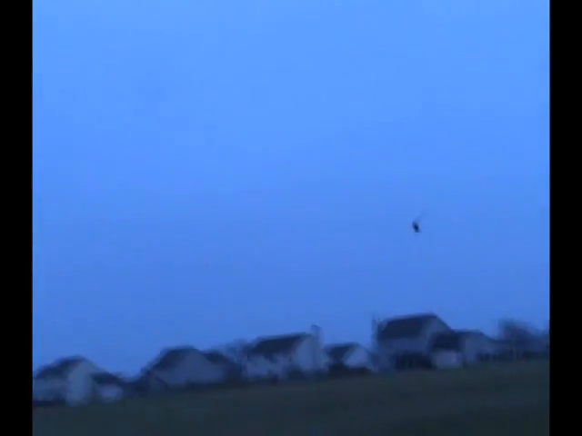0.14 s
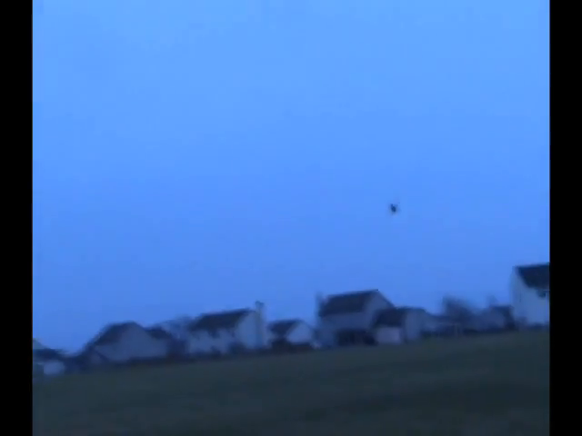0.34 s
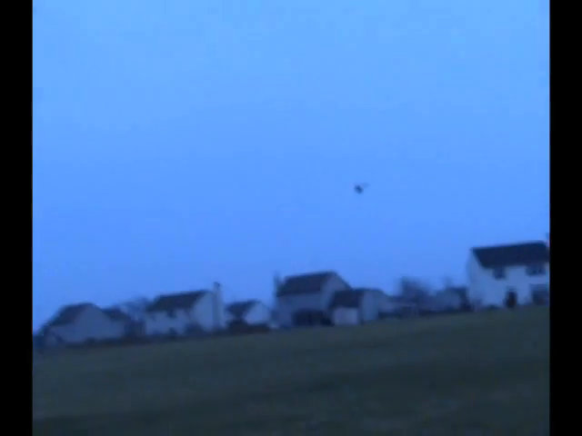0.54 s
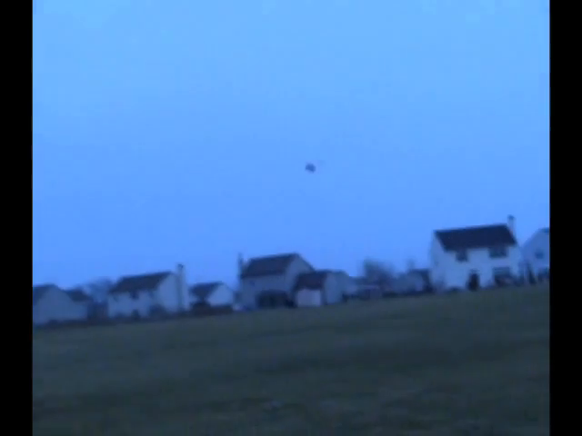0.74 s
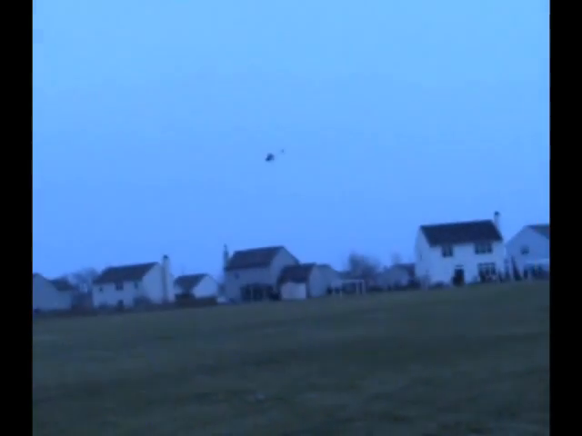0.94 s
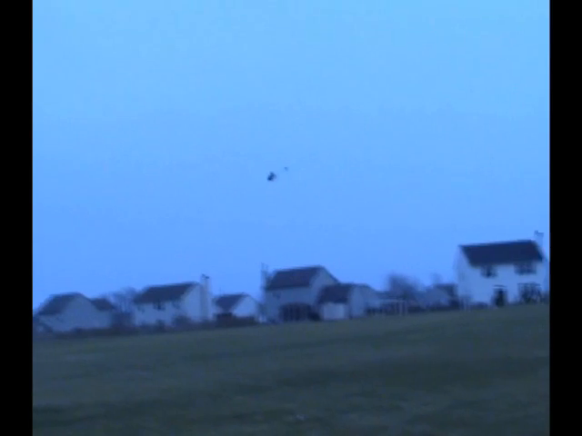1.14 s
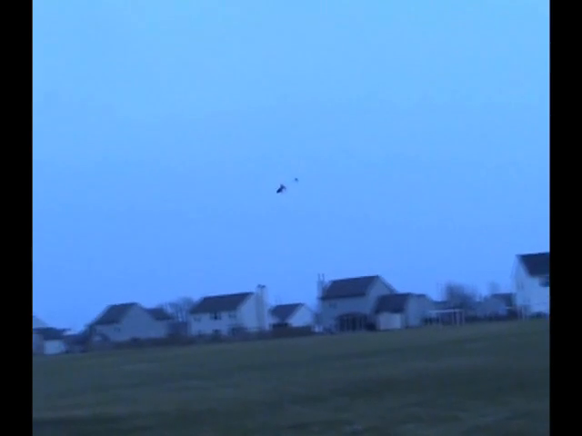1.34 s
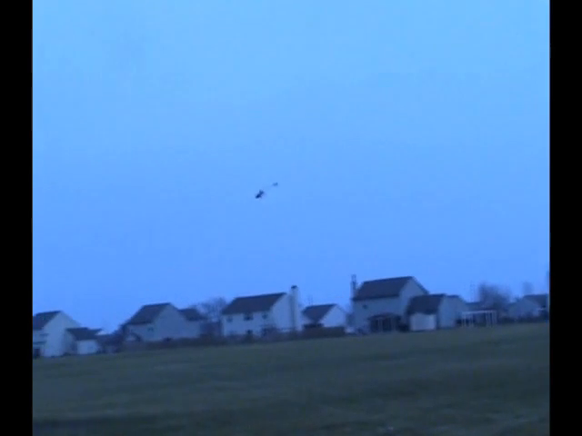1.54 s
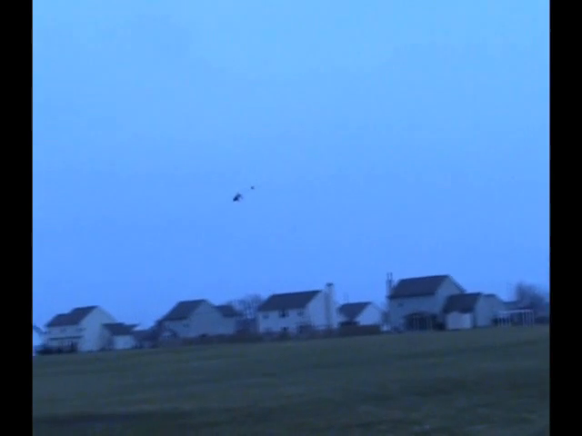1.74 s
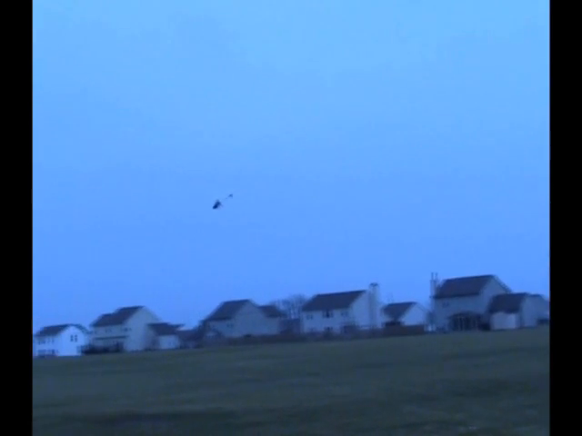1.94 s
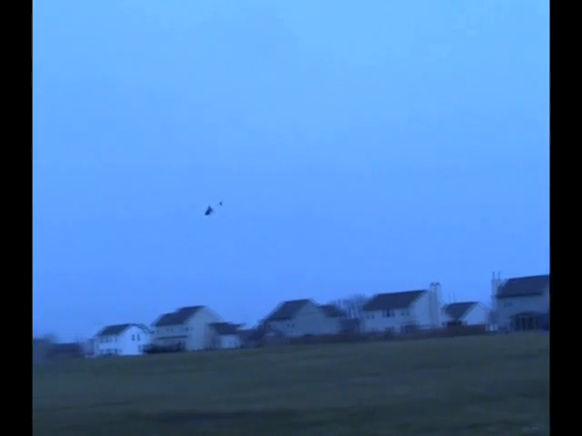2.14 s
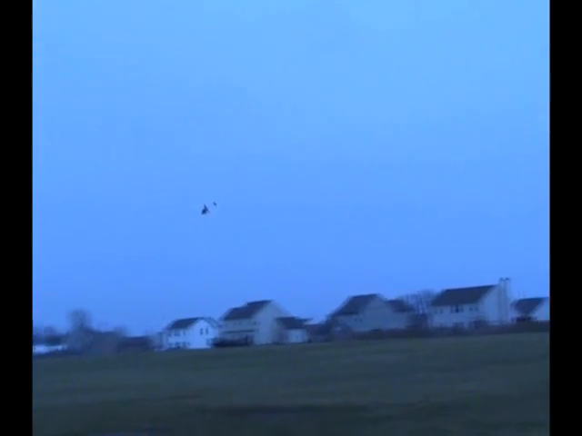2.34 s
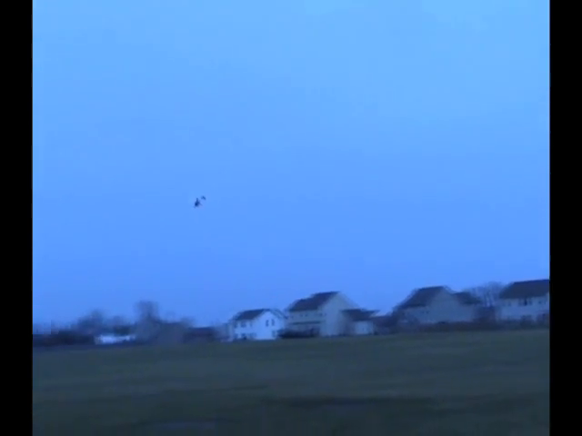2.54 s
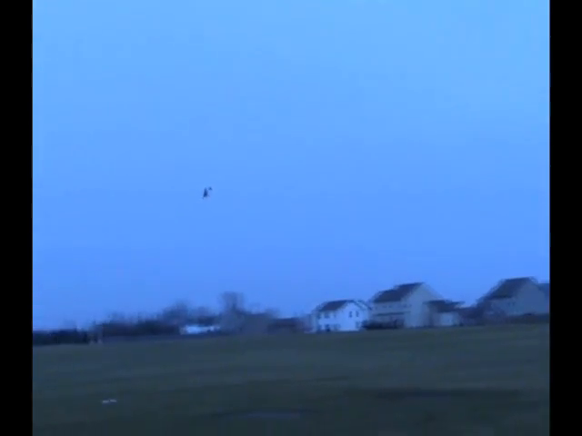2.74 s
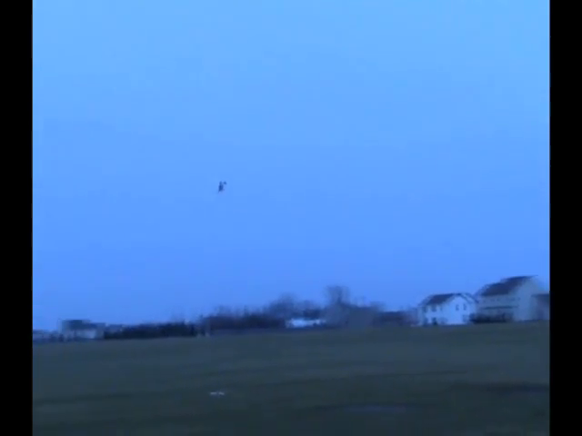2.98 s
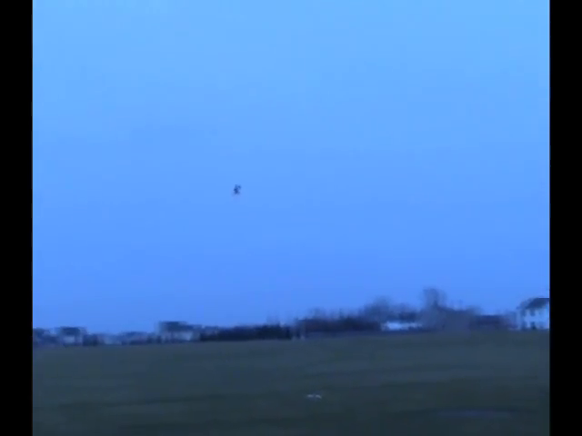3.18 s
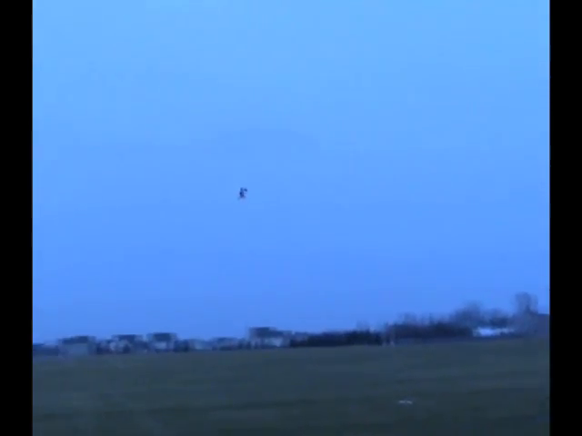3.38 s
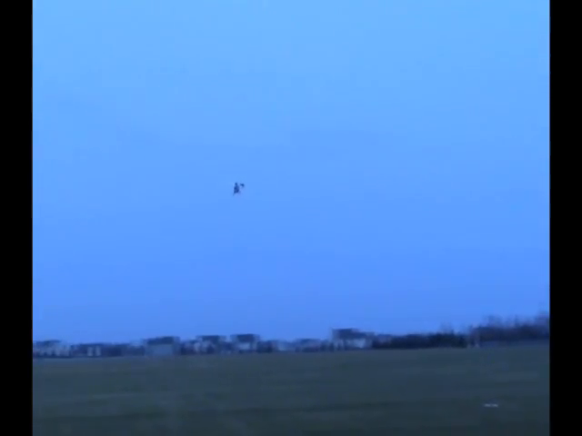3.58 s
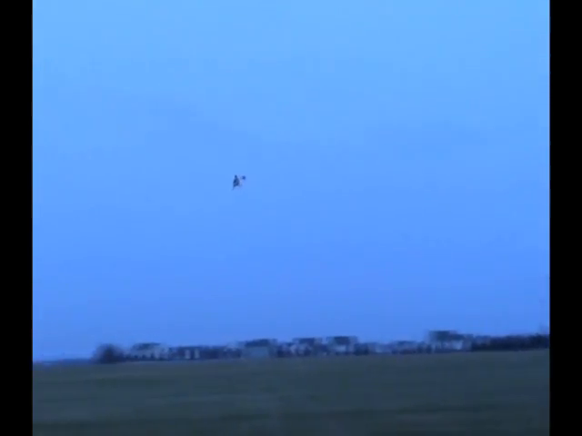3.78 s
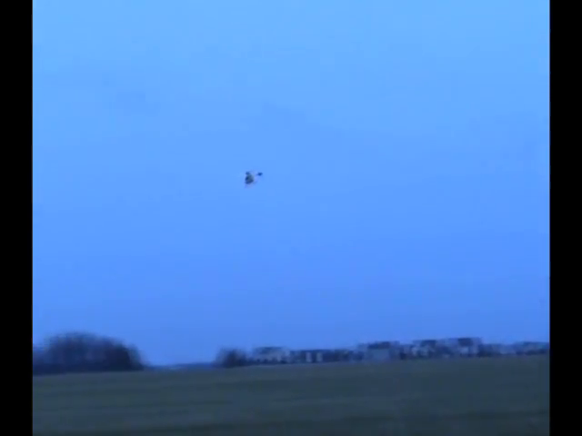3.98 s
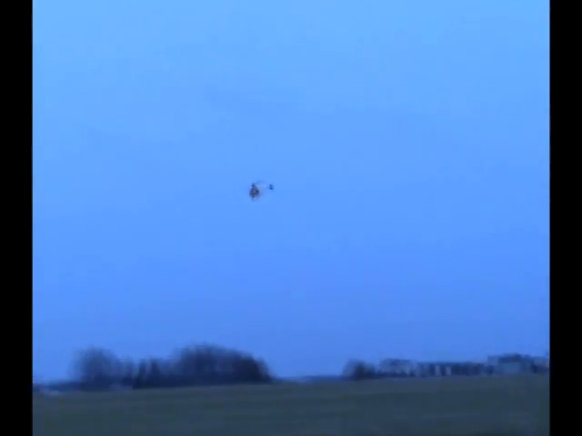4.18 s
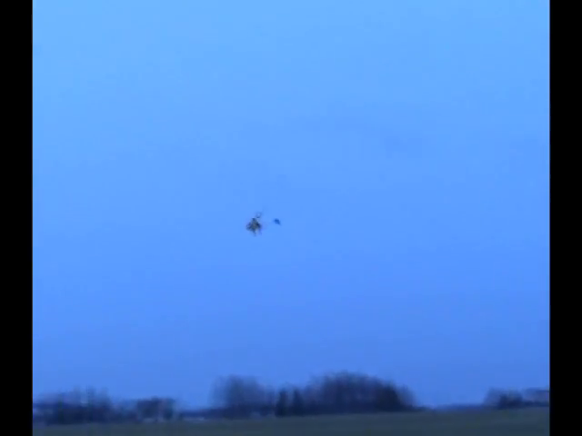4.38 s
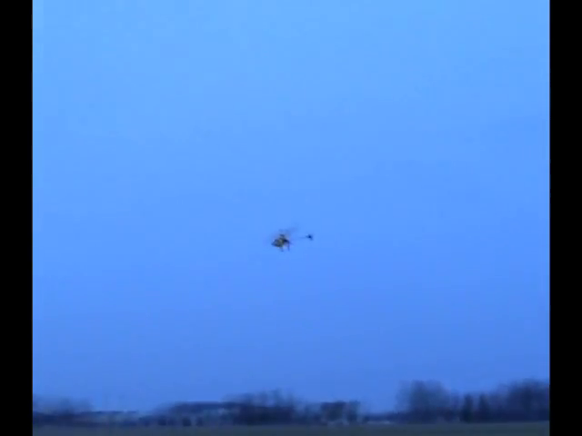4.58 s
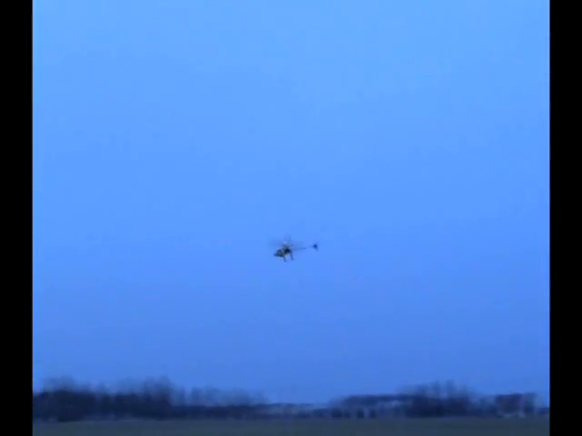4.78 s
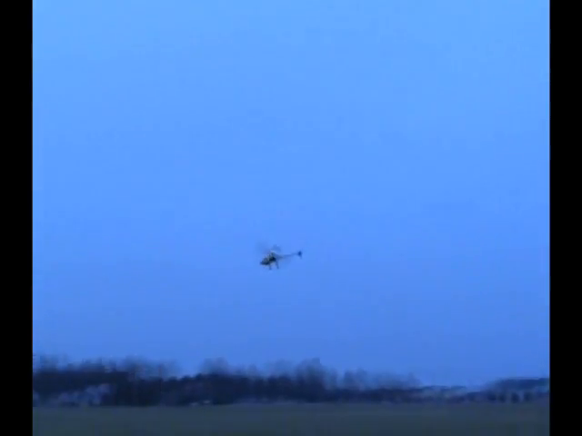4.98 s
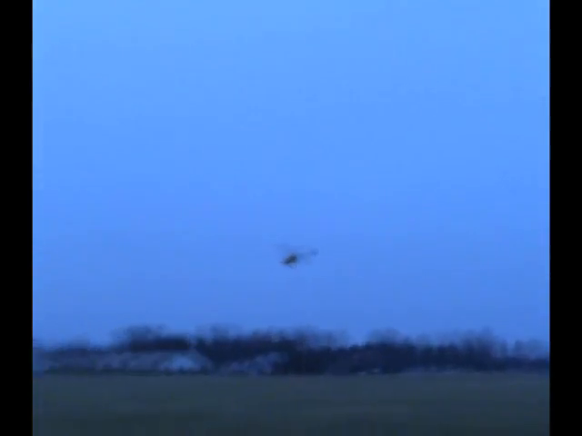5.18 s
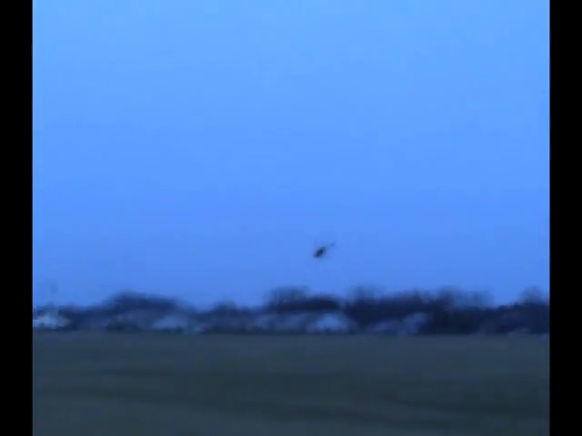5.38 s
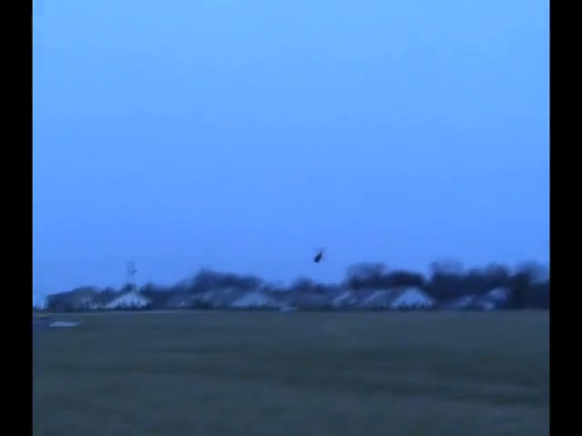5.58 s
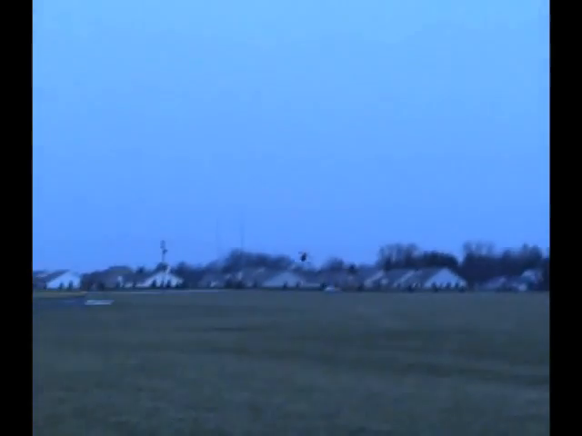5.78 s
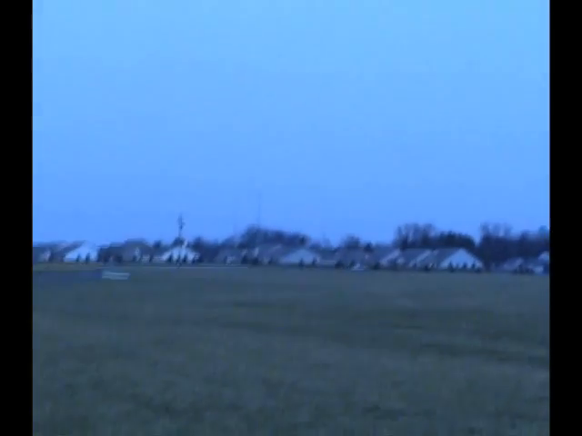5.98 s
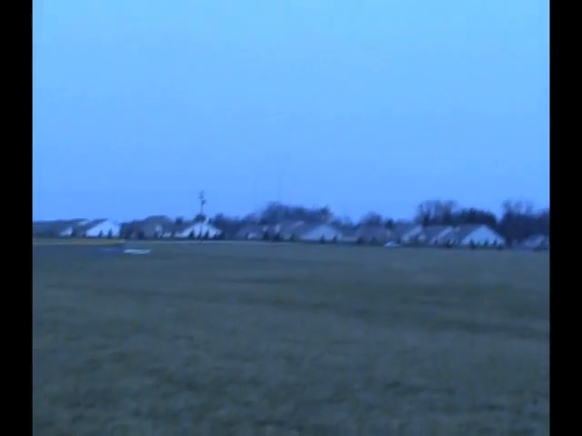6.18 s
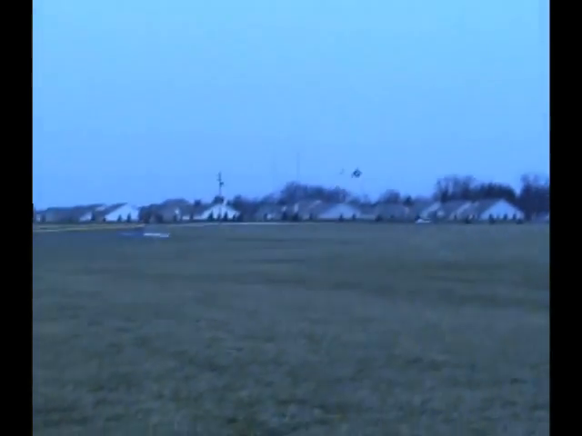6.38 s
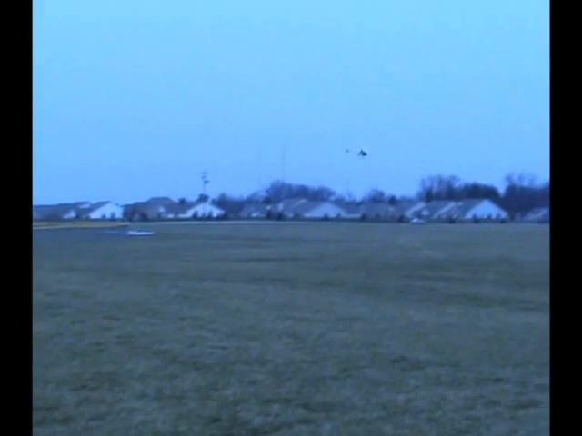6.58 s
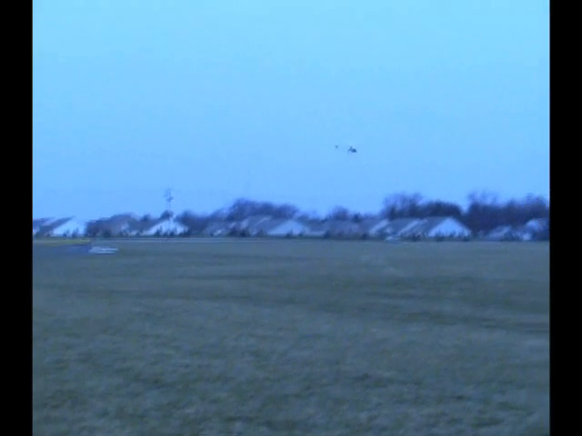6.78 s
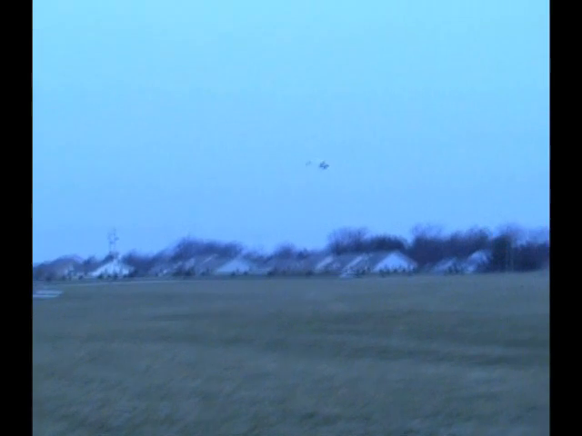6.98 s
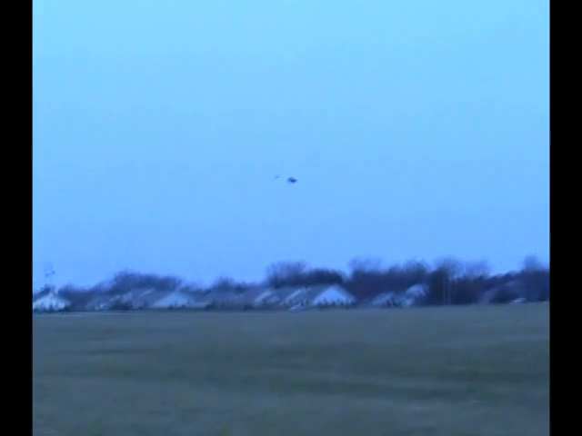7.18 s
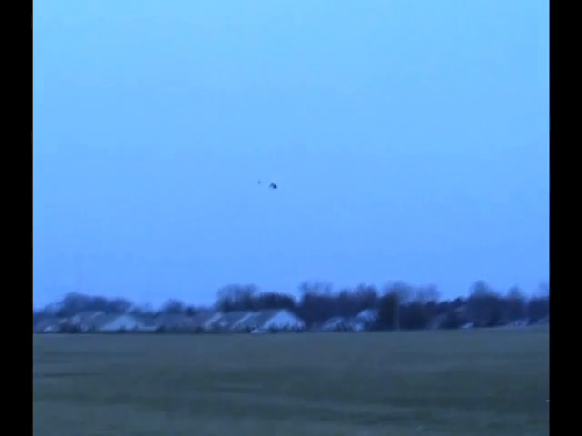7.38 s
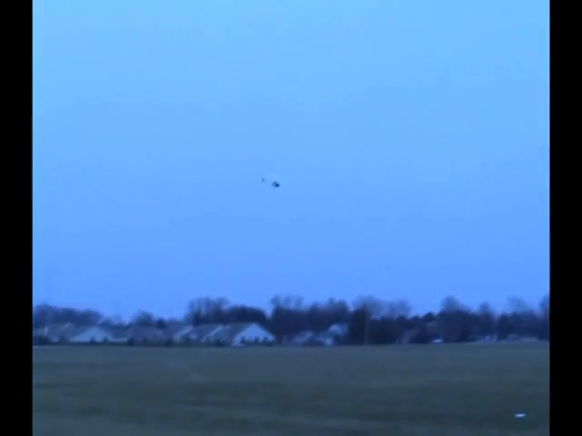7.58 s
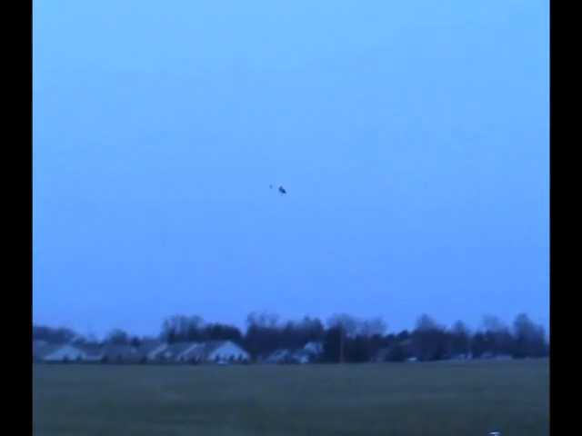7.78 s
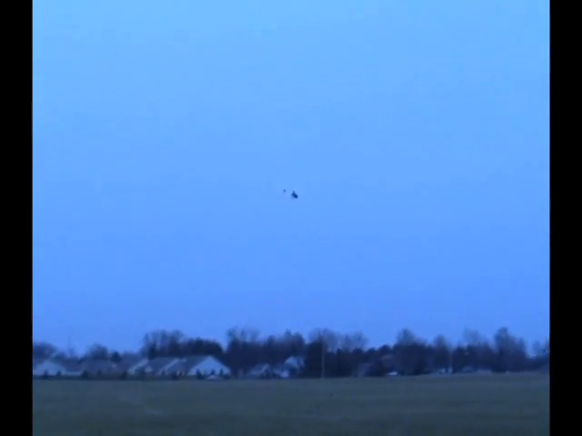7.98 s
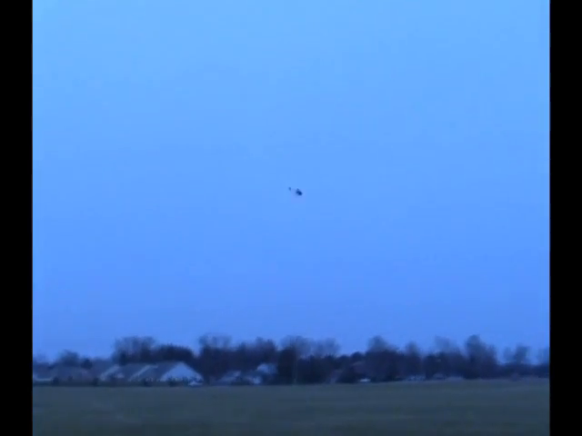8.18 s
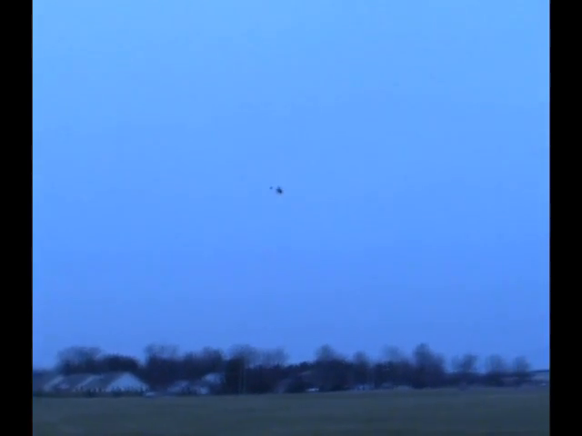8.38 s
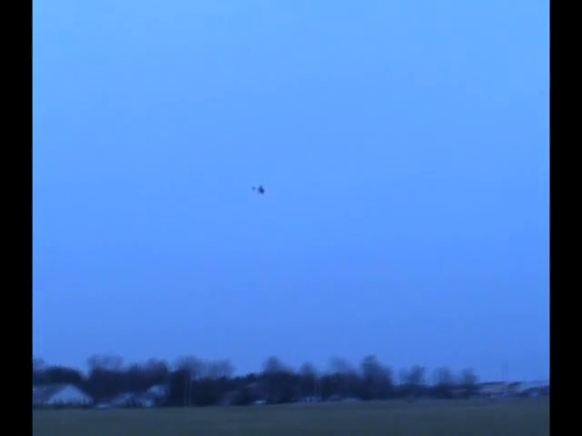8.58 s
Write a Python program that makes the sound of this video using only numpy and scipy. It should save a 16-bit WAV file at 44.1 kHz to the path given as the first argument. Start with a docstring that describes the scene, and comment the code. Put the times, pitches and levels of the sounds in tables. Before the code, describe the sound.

Thin, high warbling whine and buzzy hiss of a toy-sized helicopter circling a grass field, over rumbling wind bursts.

```python
"""Model helicopter over grass

A small electric model helicopter circles over a grass field and passes close by a hand-held camera.
Its slightly off-centre main gear whines in three partials that warble once a rotor turn.
The drive hisses and rings (shaped noise) and the blades swish; a late copy off the ground sweeps a comb
through it all. Gusts and a breeze rumble on the microphone, over a steady distant rumble."""
import sys
import numpy as np
from scipy.fft import rfft, irfft, next_fast_len
from scipy.io import wavfile
from scipy.ndimage import map_coordinates

SR = 44100
rng = np.random.default_rng(int(sys.argv[2]) if len(sys.argv) > 2 else 0)


def waveform_to_disk(signal):
    """Save audio, clipped to [-1, 1], as 16-bit WAV at the path in sys.argv[1]."""
    frames = np.transpose(np.atleast_2d(signal))
    scaled = np.clip(frames, -1, 1) * 32767
    samples = np.round(scaled).astype(np.int16)
    wavfile.write(sys.argv[1], SR, samples)


N = 380671  # length in samples


def amp(db):
    """Turn decibels into a gain."""
    return 10 ** (np.asarray(db) / 20)


def unit(x):
    """Scale to an average strength (rms) of 1."""
    return x / np.sqrt(np.mean(x ** 2) + 1e-20)


def along(points, hz):
    """Read a table of (pitch, value) points on a log pitch axis."""
    point_hz, value = np.transpose(points)
    return np.interp(np.log(hz + 1), np.log(point_hz + 1), value)


def curves(rows):
    """Turn each column after the time into one value per sample."""
    time_s, *columns = np.transpose(rows)
    return [np.interp(np.arange(N) / SR, time_s, column) for column in columns]


def wobble(rate):
    """A smooth random curve through a given number of random points a second."""
    points = rng.standard_normal(int(N * rate / SR) + 4)
    return map_coordinates(points, [np.arange(N) * rate / SR])


def filtered(x, response):
    """Shape a sound by a gain that depends on frequency."""
    size = next_fast_len(N + 8192)  # silence after the end keeps it from wrapping round
    spectrum = rfft(x, size) * response(np.fft.rfftfreq(size, 1 / SR))
    return irfft(spectrum, size)[..., :N]


def rush(spectrum, alike):
    """Stereo noise of rms 1: the more alike the two sides, the more 'mid' and the less 'side'."""
    def mid_and_side(hz):
        angle = np.arccos(np.clip(along(alike, hz), -1, 1)) / 2
        return amp(along(spectrum, hz)) * [np.cos(angle), np.sin(angle)]

    mid, side = filtered(rng.standard_normal((2, N)), mid_and_side)
    return unit(np.array([mid + side, mid - side]))


def narrow(centre_hz, width_hz):
    """A resonance of rms 1: slow noise carried on a pitch that may move."""
    a, b = filtered(rng.standard_normal((2, N)), lambda hz: 1 / (1 + (2 * hz / width_hz) ** 2))
    phase = 2 * np.pi * np.cumsum(centre_hz * np.ones(N)) / SR
    return unit(a * np.cos(phase) + b * np.sin(phase))


def throb(turns, at, depth_db):
    """A gain of rms 1 that swells once a turn, at a given share of the turn."""
    return unit(amp(depth_db * np.cos(2 * np.pi * (turns - at))))


def swell(middle, half_length):
    """A gain that rises smoothly to 1 and falls again."""
    return np.exp(-((np.arange(N) / SR - middle) / half_length) ** 2)


# how alike left and right are, for the distant rumble and the craft's broad noise: pitch_hz, likeness_0_to_1
AIR_ALIKE = [(100, 0.72), (500, 0.75), (1200, 0.74), (3000, 0.63), (12000, 0.84)]
# colour of the distant rumble: pitch_hz, relative_level_db
FIELD_COLOUR = [(20, -2.5), (55, -2.5), (100, -1.5), (200, -5), (350, -16), (700, -14), (1400, -12.5),
                (2300, -22), (5000, -29), (12000, -44)]


def field_rumble():
    """A steady, distant rumble: noise that is strongest in the bass."""
    return amp(-52.5) * rush(FIELD_COLOUR, AIR_ALIKE)


GUST_ATTACK_S, GUST_RELEASE_S = 0.0071, 0.026


def gust(start, length):
    """A gain that jumps up, holds and dies away."""
    t = np.arange(N) / SR - start
    rise = np.clip(t / GUST_ATTACK_S, 0, 1)
    return rise * np.exp(-np.maximum(t - length, 0) / GUST_RELEASE_S)


# gusts on the microphone: start_s, length_s, level_db before the unevenness,
# small_bright_eddies_share_0_to_1, left_minus_right_db
GUSTS = [(0, 0.097, -43, 0, 0), (0.278, 0.028, -37, 0, 0), (0.397, .25, -51.5, 0, 1),
         (1.301, .03, -40, 0, 0), (1.42, 0.021, -41, 0, 0), (2.167, 0.14, -46, 0, 4),
         (3.046, 0.33, -50.5, .02, 2.5), (3.5, 0.61, -54, 0.05, -3), (4.307, .17, -46.5, 0.26, -3),
         (4.462, 0.18, -32.5, 0.99, -0.5), (4.652, 0.73, -39, .4, 1), (4.935, 0.016, -30.5, 0.5, 0),
         (5.415, 0.019, -35.5, 0.6, 0), (6.128, 0.2, -40, 0.13, 2), (7.135, 0.53, -43, 0.1, -3.5),
         (7.794, 0.99, -43, 0.09, -5), (8.079, 0.053, -36, 0.42, -0.5), (8.19, 0.096, -40.5, 0.32, -1),
         (8.492, 0.066, -31.5, 0.46, 0)]
# colours of the large and the small eddies: pitch_hz, relative_level_db
LARGE_EDDIES = [(15, -17), (35, -8.5), (65, 0.5), (110, -2.5), (180, -12), (300, -23.5), (600, -27),
                (2000, -79)]
SMALL_EDDIES = [(30, -36), (80, -5.5), (160, 3), (260, -2), (400, -8.5), (700, -20.5), (1500, -45),
                (4000, -59)]
# how alike left and right are, in the gusts and in the breeze: pitch_hz, likeness_0_to_1
GUST_ALIKE = [(40, 0.29), (400, 0.29)]
BREEZE_ALIKE = [(40, .05), (300, .2)]
BREEZE_DB, BREEZE_SWING_DB = -54.5, 1.5


def wind(lumpy_db=2.0, port_db=0.5):
    """Gusts over a breeze thump unevenly on two ports: large eddies rumble, small ones flutter higher."""
    large_power = small_power = 0
    for start_s, length_s, level_db, small_share, pan_db in GUSTS:
        sides_db = [[level_db + pan_db / 2], [level_db - pan_db / 2]]
        power = (amp(sides_db) * gust(start_s, length_s)) ** 2
        small_share = np.clip(small_share, 0, 1)
        large_power = large_power + (1 - small_share) * power
        small_power = small_power + small_share * power
    large = np.sqrt(large_power) * rush(LARGE_EDDIES, GUST_ALIKE)
    small = np.sqrt(small_power) * rush(SMALL_EDDIES, GUST_ALIKE) * amp([[-1], [1.5]])
    breeze = amp(BREEZE_DB + BREEZE_SWING_DB * wobble(10)) * rush(LARGE_EDDIES, BREEZE_ALIKE)
    # part of the unevenness is shared, part belongs to each port
    uneven_db = lumpy_db * wobble(35) + port_db * np.array([wobble(16), wobble(14)])
    return amp(uneven_db) * (large + small + breeze)


# colour of the swish: pitch_hz, relative_level_db
SWISH_COLOUR = [(200, -3), (450, -4), (800, 4.5), (1400, 1.5), (1900, -3), (3000, -13.5), (8000, -33)]
# blades cutting their own wake in the turns: middle_s, half_length_s, centre_hz, level_db before the throb
WAKES = [(.1, 0.27, 853, -51), (1.957, 0.14, 1444, -57), (3.563, 0.31, 1349, -51),
         (4.292, 0.48, 902.5, -53.5), (6.38, 0.66, 1491, -54)]
SWISH_DB, SWISH_FOLLOWS = -53, 0.32  # level at 0 dB presence; dB gained per dB of presence


def blades(turns, presence_db):
    """Two blades swish twice a turn, louder and hollower where they meet their wake."""
    swish = amp(SWISH_DB + SWISH_FOLLOWS * presence_db) * rush(SWISH_COLOUR, AIR_ALIKE)
    wake = sum(amp(level_db) * swell(middle_s, half_s) * narrow(centre_hz, width_hz=690)
               for middle_s, half_s, centre_hz, level_db in WAKES)
    return (swish + wake) * throb(2 * turns, at=0.2, depth_db=1.0)


# colours of the hiss and the buzz: pitch_hz, relative_level_db
HISS_COLOUR = [(1500, -20), (3000, -12), (4200, -6), (5100, 0), (5800, -2), (6700, 3.5), (8000, 1),
               (9200, -3), (10500, -3.5), (11700, -5), (13000, -3), (14200, -18.5), (15500, -8.5)]
BUZZ_COLOUR = [(1200, -26.5), (1950, -7), (2300, -3), (2650, 1.5), (3000, 0.5), (3500, 3), (5000, 0.5),
               (7000, -23.5), (12000, -35)]
# the frame's resonances, swelling once a rotor turn (a negative depth dips there):
# pitch_hz, width_hz, swell_share_of_turn, depth_db
FRAME = [(2290, 340, .3, -0.5), (3057, 240, .8, 2), (4643, 710, 0.8, 7), (6810, 530, 0.27, 6)]
# the resonances flare up in some attitudes: middle_s, half_length_s,
# then level_db of each resonance from low to high, before the flutter
FLARES = [(0.268, 0.16, -56.5, -60, -59, -55.5), (0.648, 0.27, -58, -62, -73, -75),
          (1.06, 0.39, -66.5, -59, -55, -79), (2, 0.75, -78, -68, -64.5, -60),
          (4.45, 1, -65.5, -68, -80, -53.5), (5.7, 0.36, -59, -63, -62, -61),
          (6.3, 0.52, -74, -62, -51.5, -76), (7.2, 0.33, -80, -67, -66, -64)]
# how the gear beams its sound; the buzz follows the first column too:
# time_s, fundamental_db, octave_db, third_partial_db
BEAM = [(0, 5, -15, 2), (.7, 0.5, -16, 0), (1.8, -2, 7, 2), (2.45, -0.5, -1, -4), (2.85, -3, 9, 1.5),
        (3.55, 4.5, 11, 1), (4.5, -8, 4, 0.5), (5.22, -3.5, 11.5, -1.5), (5.48, 8.5, -0.5, 3),
        (5.82, 7.5, -9, 0), (6.02, -5, -3, 6.5), (6.5, 10.5, 7.5, 1.5), (7.45, -2, -4.5, -7),
        (7.85, 4, 3, -0.5), (8.63, 6.5, -1, 3)]
HISS_DB, BUZZ_DB = -41.5, -47  # levels at 0 dB presence, before beam and flutter
BUZZ_FOLLOWS, BUZZ_BEAM = 0.86, 0.28  # dB gained per dB of presence, and of the fundamental's beam


def drive(turns, presence_db, flutter_db=0.92):
    """Rubbing teeth and belt hiss and ring the frame, pulsing in step with the main rotor."""
    pulse = throb(turns, at=0.18, depth_db=1.0)
    pulse = pulse * throb(2 * turns, at=0.8, depth_db=1.04) * throb(4 * turns, at=0.17, depth_db=0.9)
    hiss = amp(HISS_DB + presence_db) * rush(HISS_COLOUR, AIR_ALIKE)
    fundamental_db = curves(BEAM)[0]
    buzz_db = BUZZ_DB + BUZZ_FOLLOWS * presence_db + BUZZ_BEAM * fundamental_db
    buzz = amp(buzz_db) * rush(BUZZ_COLOUR, AIR_ALIKE) * amp([[-.7], [.7]])
    ring_gains = sum(np.outer(amp(levels_db), swell(middle_s, half_s))
                     for middle_s, half_s, *levels_db in FLARES)
    ring = sum(gain * throb(turns, at, depth_db) * narrow(pitch_hz, width_hz)
               for gain, (pitch_hz, width_hz, at, depth_db) in zip(ring_gains, FRAME))
    # moving air makes the distant sound flutter
    return amp(flutter_db * wobble(10)) * (pulse * (hiss + buzz) + ring)


# how the whine is beamed to the camera: time_s, swell_share_of_turn, depth_db
FACING = [(.2, .1, 2), (1.1, .09, 8), (2.4, .1, 3), (3.4, .17, 8), (5.5, .15, 2.5), (6.5, -.13, 5),
          (7.6, -.1, 2)]
WHINE_DB, OCTAVE_DB, THIRD_DB = -51, -52, -51  # levels at 0 dB presence, before the beam and wobble


def gear(mesh_hz, turns, presence_db, warble=0.017, jitter=0.00193):
    """The off-centre gear binds once a turn: its pitch sags and each partial swells at its own angle."""
    sag = warble * np.sin(2 * np.pi * (turns - .24))
    hz = mesh_hz * (1 - warble * (np.sin(2 * np.pi * (turns - .24)) + 0) - 0)
    hz = mesh_hz * (1 - sag - warble * 0)
    hz = mesh_hz * (1 - sag + jitter * wobble(350))
    phase = 2 * np.pi * np.cumsum(hz) / SR
    angle, depth_db = curves(FACING)
    first_db, second_db, third_db = curves(BEAM)
    first = amp(WHINE_DB + first_db + wobble(16)) * unit(np.sin(phase))
    first = first * throb(turns, at=angle, depth_db=depth_db)
    second = amp(OCTAVE_DB + second_db + wobble(60)) * unit(np.sin(2 * phase))
    second = second * throb(turns, at=0.31, depth_db=4.5)
    # uneven teeth smear the third partial into a band
    third = amp(THIRD_DB + third_db) * narrow(3 * hz, width_hz=370)
    third = third * throb(turns, at=0.53, depth_db=2.5)
    return amp(presence_db) * (first + second + third)


# lag of the ground echo behind the direct sound: time_s, lag_ms
GROUND_LAG = [(0, 2.05), (.25, 1.77), (.6, 1.63), (1.25, 1.7), (2.1, 1.63), (2.45, 1.72), (2.85, 1.68),
              (4.15, 2.28), (4.65, 2.35), (5.1, 1.92), (5.42, 1.45), (5.71, 1.09), (6, .87), (6.25, .82),
              (6.6, .92), (7.5, 1.51), (8.2, 1.79), (8.63, 1.98)]
# what the turf sends back: pitch_hz, level_db before the echo strength
TURF = [(900, -16), (2000, -3), (3900, 0), (5000, -4), (7000, -11), (9000, -26)]
# strength of the ground echo, greatest when the craft flies low: time_s, strength_0_to_1
GRAZING = [(0, .6), (.7, .88), (1.5, .55), (2.4, .3), (4.8, .25), (5.6, .55), (6.2, .78), (7, .55),
           (8.6, .55)]


def over_grass(x):
    """The ground returns a late copy, turned a quarter cycle by the porous turf: a moving comb."""
    late = np.arange(N) - curves(GROUND_LAG)[0] * SR / 1000
    bounce = filtered(x, lambda hz: -1j * amp(along(TURF, hz)))
    echo = np.array([map_coordinates(side, [late], order=3) for side in bounce])
    return x + curves(GRAZING)[0] * echo


# gear mesh pitch, from rotor speed and Doppler shift, before the warble: time_s, pitch_hz
MESH = [(0, 3790), (.7, 3825), (1.5, 3830), (2, 3870), (2.58, 3870), (2.9, 3690), (3.2, 3640), (4.5, 3770),
        (5, 3790), (6, 3920), (6.4, 4020), (7.3, 4095), (8.15, 4090), (8.63, 3990)]
# how strongly the craft reaches the camera, by distance and attitude: time_s, level_db against the close pass
PRESENCE = [(0, -4.5), (.35, -5.5), (.6, -9.5), (2.4, -11.5), (3.4, -15), (4.05, -8.5), (4.55, -1),
            (5.22, 0), (5.5, -4), (5.95, -5), (6.55, -10), (7.15, -7.5), (7.48, -11.5), (7.85, -10),
            (8.63, -14)]
TEETH = 141  # gear teeth passing in one rotor turn


def scene():
    """The distant rumble and the wind, then the helicopter with its ground echo."""
    mesh_hz, = curves(MESH)
    presence_db, = curves(PRESENCE)
    turns = np.cumsum(mesh_hz) / SR / TEETH
    background = field_rumble() + wind()
    craft = blades(turns, presence_db) * amp([[-1], [1.2]])
    craft = craft + drive(turns, presence_db) + gear(mesh_hz, turns, presence_db)
    return background + over_grass(craft) * amp([[-.3], [.3]])


TOP_HZ = 15800


def record(dry):
    """The camera keeps nothing above its band limit."""
    return filtered(dry, lambda hz: hz < TOP_HZ)


dry = scene()
out = record(dry)
waveform_to_disk(out)
```